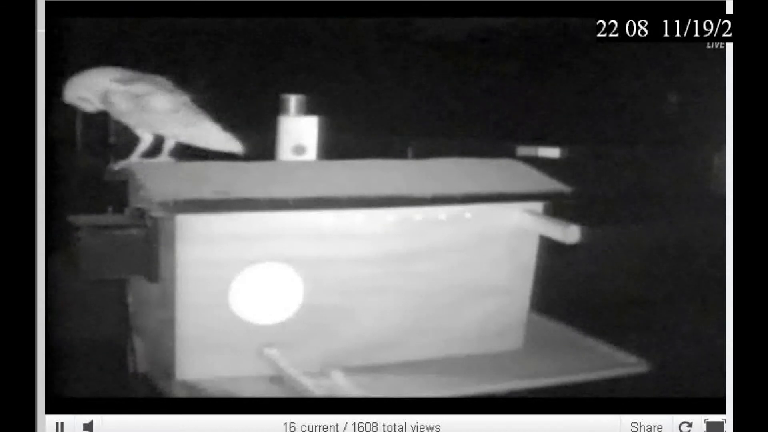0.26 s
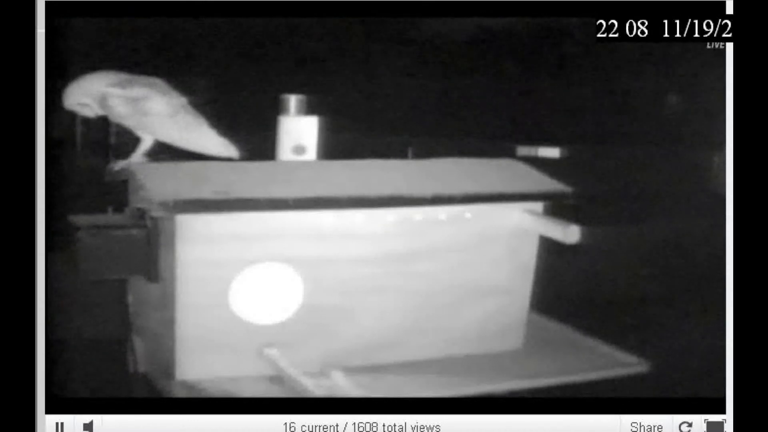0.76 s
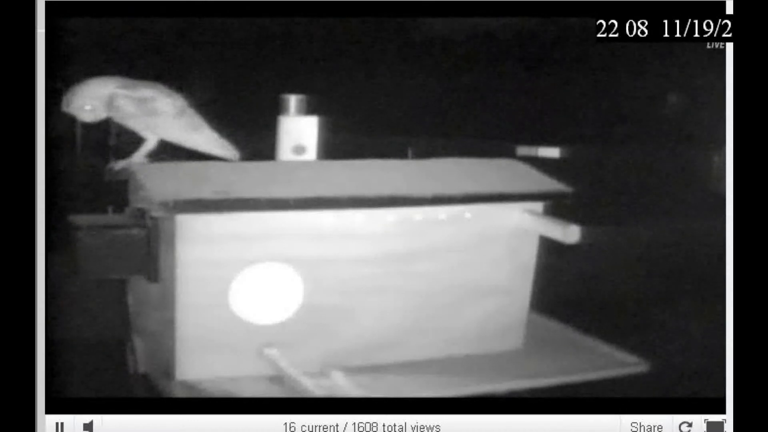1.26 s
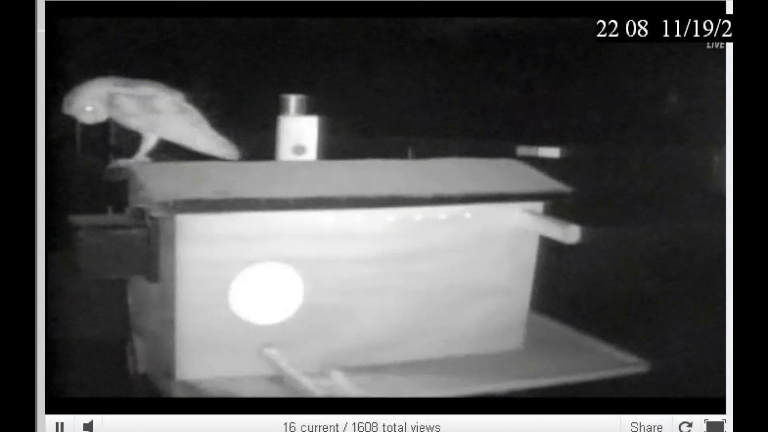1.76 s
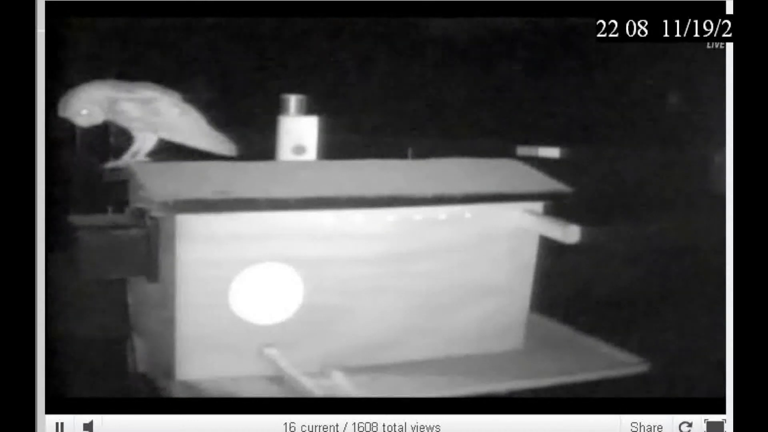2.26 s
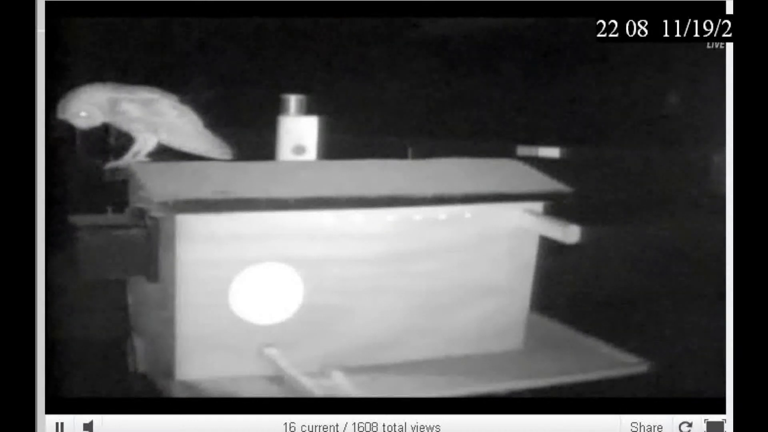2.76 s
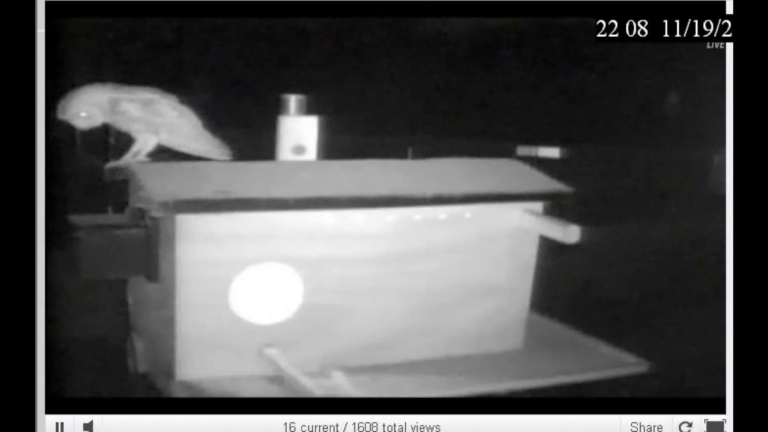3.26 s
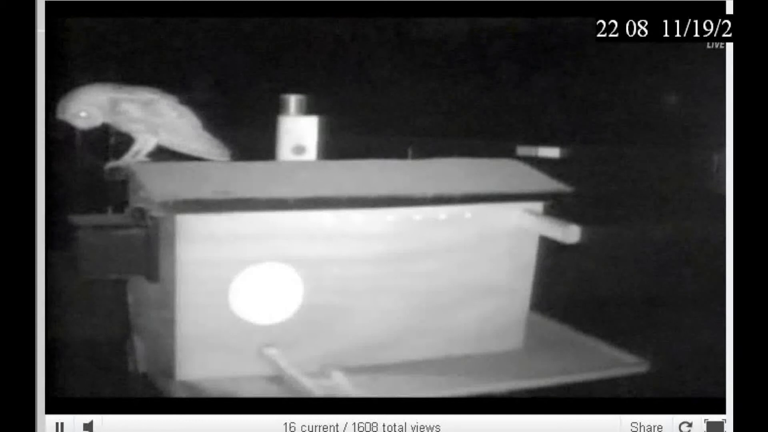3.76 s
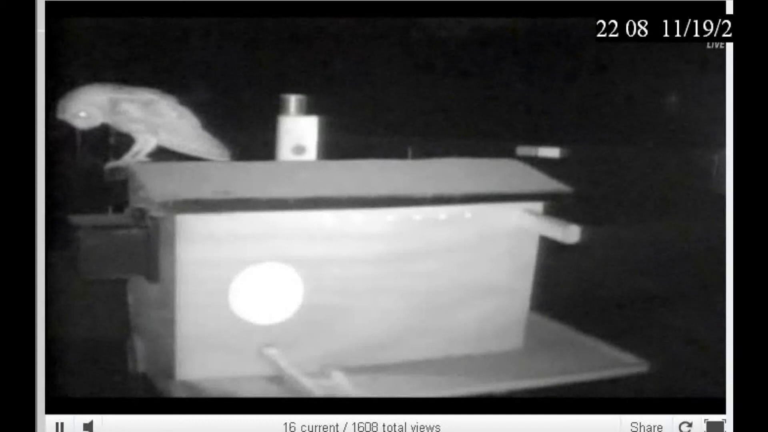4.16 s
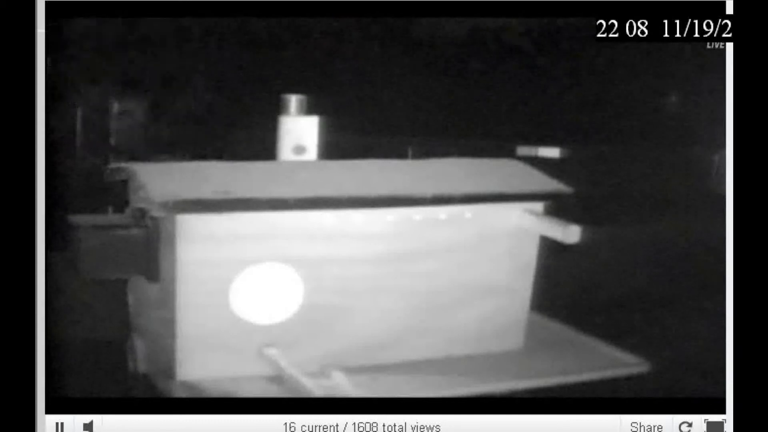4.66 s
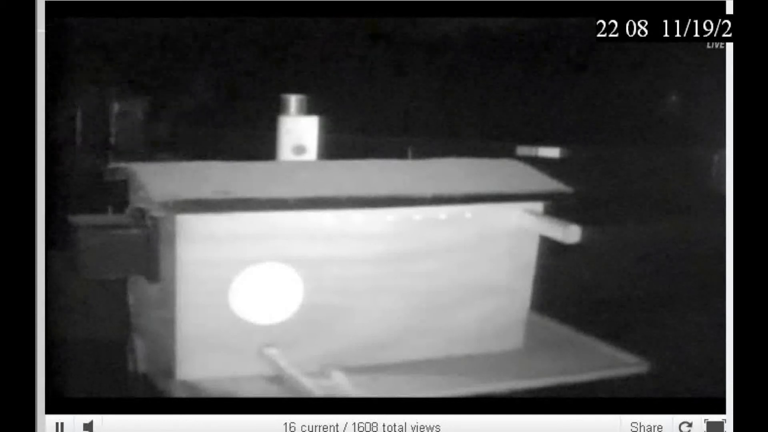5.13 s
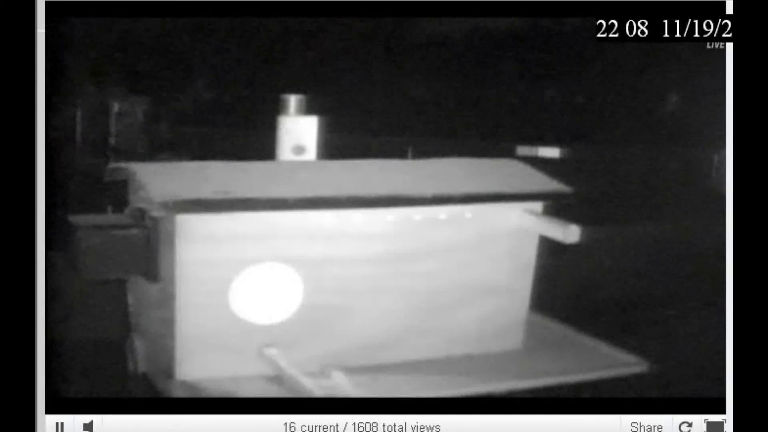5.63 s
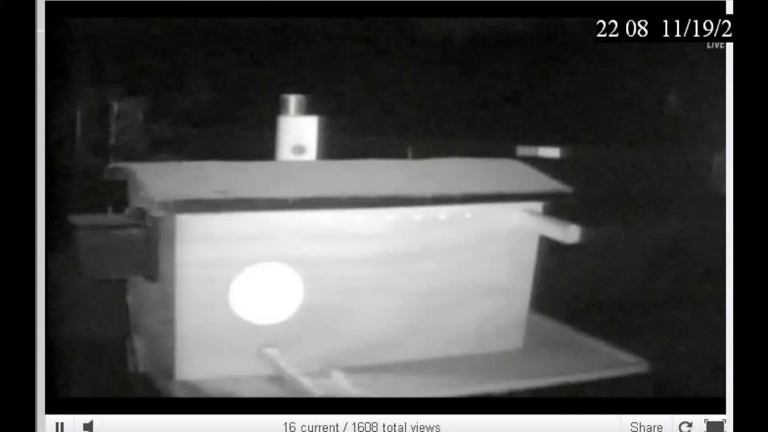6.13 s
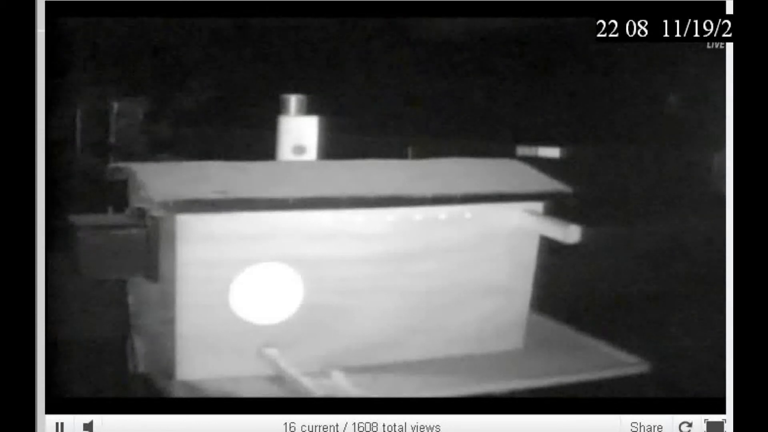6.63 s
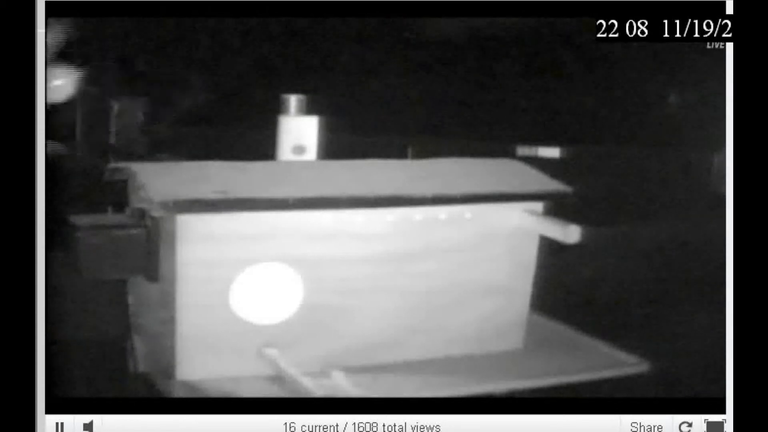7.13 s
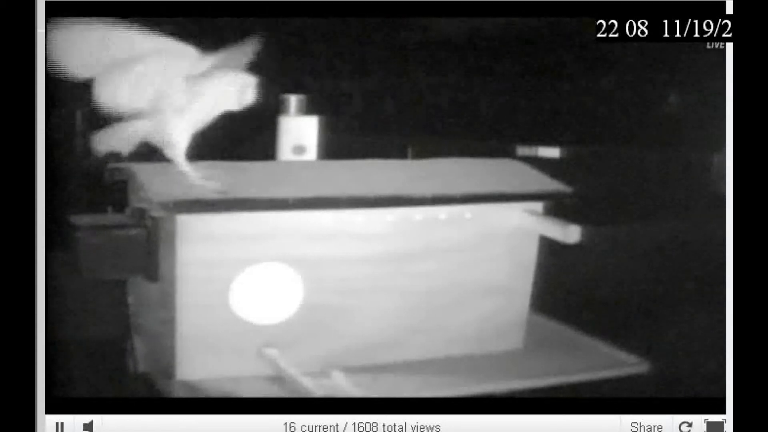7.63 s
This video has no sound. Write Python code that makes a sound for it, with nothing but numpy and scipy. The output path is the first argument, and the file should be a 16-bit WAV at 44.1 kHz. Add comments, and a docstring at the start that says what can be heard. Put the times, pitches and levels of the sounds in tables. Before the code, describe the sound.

A close microphone inside a hollow wooden nest box picks up low, wavering night hum, with light hiss, deep rumble and a faint rough high whine. Around 1 s an owl begins shifting on the roof: dry, gritty talon scratches and soft hollow knocks, densest from 1.2 to 1.9 s, with a strong thump near 1.75 s and a bright scrape just after. Sparser steps and scratches come at 2.3, 2.6 and 3.1 s. At about 3.4 and 3.75 s two massive stamps boom through the box, the loose roof rattling, peaks breaking into harsh crackle. Lesser knocks follow near 4 s, with small scrapes until 4.3 s. The hum thins and it is nearly quiet, save a tiny tick around 5.4 s. From 6.05 to 6.4 s a quick cluster of scrapes and firm woody thumps breaks out, then only quiet hum, hiss and whine to the end, near 7.9 s.

```python
"""Night air hums first, close around a microphone inside a wooden nest box, under hiss, rumble and a faint whine.
Then an owl shifts about on the roof: talons scrape the boards as stick-slip ticks that ring the upper box modes,
and feet knock the hollow box, each push shaking cavity, roof and walls into their low modes.
The hardest blows overflow the converter and wrap; the sound is then passed on over a narrow, noisy stereo line."""
import sys
import numpy as np
from scipy import signal
from scipy.io import wavfile
from scipy.ndimage import uniform_filter1d

SR = 44100
rng = np.random.default_rng(int(sys.argv[2]) if len(sys.argv) > 2 else 0)


def digitize_waveform(pressure):
    """Quantize a signal to 16-bit integers and store it at the path in sys.argv[1].

    Rows of a 2-D input are taken as channels; values are limited to [-1, 1].
    """
    field = np.atleast_2d(pressure).T
    bounded = np.clip(field, -1, 1)
    quanta = np.round(bounded * 32767).astype(np.int16)
    wavfile.write(sys.argv[1], SR, quanta)


N = 347949


def undb(db):
    """dB to amplitude gain."""
    return 10 ** (np.asarray(db) / 20)


def level(x, db):
    """Scale to an rms level in dB."""
    return x * undb(db) / np.sqrt(np.mean(x ** 2))


def curve(rows):
    """Draw straight lines through (seconds, value) rows, read at every sample."""
    seconds, values = np.transpose(rows)
    return np.interp(np.arange(N) / SR, seconds, values)


def band(x, lo_hz, hi_hz, order=2):
    """Butterworth band-pass."""
    return signal.sosfilt(signal.butter(order, [lo_hz, hi_hz], "band", fs=SR, output="sos"), x)


def walk(rate):
    """Random levels held 1 / rate seconds and smoothed twice; spread near 1."""
    hold = int(SR / rate)
    steps = np.repeat(rng.standard_normal(N // hold + 1), hold)
    smooth = uniform_filter1d(uniform_filter1d(steps, hold), hold)
    return 1.3 * smooth[:N]


# Resonances of the wooden box. Each row: frequency in Hz, relative gain in dB, 60 dB decay time in seconds.
BOX_MODES = [(117.3, -2.2, 0.22), (144.1, -3.5, 0.17), (166, -8, 0.15), (189.97, -2.5, 0.18),
             (208.44, -6, .12), (231.6, -5.5, 0.13), (261.4, -13, 0.14), (307.4, -10.5, 0.061),
             (369.4, -6.5, 0.15), (393, -7, 0.086), (521, -12, 0.0086), (783, 4, 0.075), (856, 3, 0.13),
             (1116, -5, 0.059), (1460, -4.5, 0.015), (1614, -7, 0.039), (1958, 0.5, 0.026),
             (2143, -1, 0.042), (2957, 4.5, 0.0065), (3583, 8, 0.012), (4170, 11, 0.0074),
             (5140, 14.5, 0.0088), (5790, 13.5, 0.0048), (6600, -16, 0.011)]


def ring(force, lo_hz, hi_hz):
    """The box modes between two frequencies, each a decaying sine driven by a force."""
    out = 0
    for hz, db, t60 in BOX_MODES:
        if lo_hz <= hz < hi_hz:
            pole = np.exp((2j * np.pi * hz - np.log(1000) / t60) / SR)
            out = out + undb(db) * signal.lfilter([1], [1, -pole], force).imag
    return out


RUMBLE_DB, HUSH_EDGE_S = -51.5, .12  # rumble level outside the hushes, time to slope in or out of one
# Spells in which the line rumble falls quiet. Each row: start in seconds, end in seconds, drop in dB.
HUSHES = [(4.046, 5.663, 19), (7.3, 7.53, 6.1)]
WHINE_HZ, DIP_HZ, CREEP_S = 12000, 1150, .24  # centre pitch, depth of a dip, time constant of its return
# Moments when the whine drops in pitch. Each entry: time in seconds.
WHINE_DIPS = [4.13, 5.41, 7.43]


def line_noise(hiss_db=-71.0, whine_db=-78.0, tone_db=-82.5, flutter_db=-7.0):
    """White hiss on each side, a thin tone, a slow rumble, and a rough whine whose pitch rides on the rumble."""
    t = np.arange(N) / SR
    hush_db = 0
    for start, end, drop_db in HUSHES:
        inside_s = np.minimum(t - start, end - t)
        hush_db = hush_db + drop_db * np.clip(inside_s / HUSH_EDGE_S + .5, 0, 1)
    rumble_gain = undb(RUMBLE_DB - hush_db)
    rumble = level(band(rng.standard_normal(N), 13, 23), 0) * rumble_gain

    swing_hz = 5e5 * rumble
    dip_hz = sum(DIP_HZ * (t >= s) * np.exp(-np.maximum(t - s, 0) / CREEP_S) for s in WHINE_DIPS)
    # fast random walks roughen both pitch and level
    whine_hz = np.clip(WHINE_HZ - dip_hz + swing_hz + 250 * walk(900), 6000, 14800)
    whine = np.sin(2 * np.pi * np.cumsum(whine_hz) / SR) * undb(whine_db + 2.5 * walk(400))

    tone = undb(tone_db) * np.sin(2 * np.pi * 5860 * t)
    hiss = undb(hiss_db) * rng.standard_normal((2, N))
    # the quicker part of the rumble differs left and right and dies away at 2 dB per second
    quick = band(rng.standard_normal((2, N)), 22, 70, order=1)
    flutter = level(quick, flutter_db) * rumble_gain * undb(-2.0 * t)
    return hiss + whine + tone + rumble + flutter


# Colour of the night air. Each row: frequency in Hz, relative noise density in dB.
AIR_COLOUR = [(29, -50), (50, -26), (75, -10), (224, -1.5), (292, -17), (373, -6.5), (449, -48),
              (866, -21.5), (980, -22), (1200, -30), (6740, -49.5), (8760, -75), (14800, -120)]
# Rise and fall of the night air. Each row: time in seconds, level in dB before a 3 dB trim.
AIR_LEVEL = [(0, -48.5), (2, -47.5), (3.3, -46), (4.2, -46.5), (4.5, -51), (6.3, -51.5), (6.7, -54.5),
             (7.89, -54.5)]


def night_air(box_db=-12.5):
    """Narrow noise bands a third of an octave apart that flicker alone, part of them humming in the box modes."""
    hz, db = np.transpose(AIR_COLOUR)
    air = 0
    for mid_hz in 56 * 2 ** np.arange(0, 7, 1 / 3):
        noise = rng.standard_normal(N)
        colour_db = np.interp(np.log(mid_hz), np.log(hz), db)
        gain = undb(colour_db + 0.81 * walk(5.9))
        air = air + gain * band(noise, mid_hz * 0.98, mid_hz * 1.045, order=1)
    hum = ring(air, 60, 1300)
    return (level(air, 0) + level(hum, box_db)) * undb(curve(AIR_LEVEL) - 3.0)


FADE_S, FADE_PER_RISE = .06, 2.5  # 60 dB fade time of a scrape: a base, plus this many rise times


def drag(rise, t):
    """How hard a talon drags: a smooth rise, then a fade, longer for slow drags."""
    t60 = FADE_S + FADE_PER_RISE * rise
    onset = np.sin(np.pi / 2 * np.minimum(t / rise, 1)) ** 2
    return onset * undb(-60 * np.maximum(t - rise, 0) / t60)


# Talon scrapes on the boards. Each row: middle of the rise in seconds, relative level in dB, pitch in Hz,
# fall away from that pitch in dB per octave, rise time in seconds.
SCRAPES = [(.962, -67, 1350, -1.7, 0.013), (.981, -50, 1420, 14, 0.013), (1.022, -57.5, 1380, 9, 0.015),
           (1.08, -49, 680, 25, 0.011), (1.191, -53, 680, 19, .011), (1.252, -52, 1700, 5, 0.025),
           (1.371, -56.5, 1920, 5, 0.012), (1.49, -61, 2130, 9, .015), (1.516, -47, 1960, 16, 0.023),
           (1.534, -49, 2160, 2, 0.026), (1.555, -38, 700, 14, 0.0048), (1.74, -52, 1740, 2.3, 0.033),
           (1.761, -38, 4290, 19, 0.011), (1.837, -30, 2190, 9.5, 0.017), (1.871, -58.5, 5500, 14, .015),
           (1.912, -42.5, 3230, 7, 0.016), (2.249, -50, 1580, 5, 0.039), (2.263, -42.5, 700, 5, 0.011),
           (2.595, -41.5, 2290, 8.5, 0.024), (2.604, -43.5, 5300, 6, 0.012), (2.903, -54, 5310, 7, 0.015),
           (3.076, -53, 5290, 5.5, 0.032), (3.306, -52, 2130, 0.86, 0.022),
           (3.697, -48.5, 750, 14.5, 0.021), (3.811, -52, 1470, 6.5, 0.012), (3.946, -59.5, 1940, 1, 0.024),
           (4.113, -46, 1940, 3.5, 0.012), (4.14, -57, 750, 2, 0.042), (4.16, -57, 3600, 9, .03),
           (4.173, -57, 2800, 12, .025), (4.253, -55, 1750, 18, .025), (5.376, -58, 3720, 3.5, 0.014),
           (6.07, -53, 4760, 5, 0.024), (6.072, -55, 2800, 6, .03), (6.1, -53, 1820, 10.5, .018),
           (6.255, -53.5, 1950, 7, 0.028), (6.29, -39.5, 1390, 4.5, 0.022), (6.31, -32.5, 1430, 11, 0.0083),
           (6.377, -52, 1400, 24, .018)]
# Edges of the scrape bands. Each entry: frequency in Hz.
SCRAPE_EDGES_HZ = [600, 1200, 2500, 4000, 7000]
# How readily the boards speak. Each entry: relative gain in dB of one scrape band, low to high.
BOARD_DB = [4, 0.4, -3.5, 1.5]


def scrapes(spread_db=1.5, bare_db=-2.5, squeak_db=18.0):
    """Talons stick and slip over the grain: dense uneven ticks into the upper modes, partly heard bare."""
    uneven = undb(spread_db * rng.exponential(size=N))
    ticks = level(rng.standard_normal(N) * uneven, 0)
    t = np.arange(SR // 4) / SR
    out = np.zeros(N)
    starts = [int((middle - rise / 2) * SR) for middle, _, _, _, rise in SCRAPES]
    for board_db, lo_hz, hi_hz in zip(BOARD_DB, SCRAPE_EDGES_HZ, SCRAPE_EDGES_HZ[1:]):
        force = np.zeros(N)
        for (_, db, hz, fall_db, rise), at in zip(SCRAPES, starts):
            octaves = abs(np.log2(np.sqrt(lo_hz * hi_hz) / hz))
            gain = undb(db + board_db - fall_db * octaves)
            force[at:at + len(t)] += gain * drag(rise, t) * ticks[at:at + len(t)]
        # both paths are scaled by what steady ticks would give in this band
        rung = ring(force, lo_hz, hi_hz) / ring(ticks, lo_hz, hi_hz).std()
        bare = undb(bare_db) * force / band(ticks, lo_hz, hi_hz).std()
        out += band(rung + bare, 0.86 * lo_hz, 1.175 * hi_hz)
    # each talon tip squeaks in a narrow band at the pitch of its scrape
    for (_, db, hz, _, rise), at in zip(SCRAPES, starts):
        tip = band(drag(rise, t) * ticks[at:at + len(t)], .97 * hz, 1.03 * hz)
        out[at:at + len(t)] += undb(db + squeak_db) * tip
    return out


# Foot-falls on the roof. Each row: time in seconds, relative level in dB,
# place (0 over the air cavity, 1 mid roof, 2 on the wall edge).
FOOT_FALLS = [(1.106, -41, 1.0), (1.239, -22.5, 0.62), (1.272, -26, .2), (1.288, -23, .9),
              (1.418, -35, 0.34), (1.526, -28, 1.74), (1.549, -19.5, 1.74), (1.589, -27.5, 0.64),
              (1.745, -26, 1.7), (1.764, -10.5, 0.5), (1.809, -17, .3), (1.846, -21, 1.06),
              (1.889, -21.5, 0.24), (2.263, -23, 0.27), (2.31, -27.5, 0.19), (2.598, -18, .9),
              (2.618, -21, .8), (2.642, -22, .85), (2.662, -23, .9), (2.827, -25, 0.44), (2.868, -39, 0.27),
              (3.066, -32.5, 0.38), (3.209, -37.5, .3), (3.42, -17, 1.27), (3.698, -24, 0.043),
              (3.9, -22, .8), (3.935, -21, .5), (3.977, -14, .15), (4.158, -39.5, 2.1), (4.377, -38, .02),
              (5.442, -45, 0.98), (6.084, -32.5, 0.64), (6.139, -31.5, 0.73), (6.227, -33.5, .1),
              (6.307, -15.5, 0.6), (6.324, -13, .7), (6.328, -22, 1.9), (6.35, -20, .3), (6.381, -17, .5),
              (6.385, -27, 1.9), (6.42, -27, .7)]
# Two hard stamps. Each row: time in seconds, relative level in dB, place as above.
STAMPS = [(3.428, -1.8, .88), (3.762, -1.8, .7)]
# Each stamp and the loose roof rattling after it. Each row: delay in seconds, level change in dB, shift of place.
RATTLE = [(0, 0.5, 0), (.0065, -2, -.03), (.016, -1, -.2), (0.0234, -2.5, -.03), (.047, -3.5, -.64),
          (.101, -16, .02)]
# Own notes of air cavity, roof and walls. Each entry: frequency in Hz.
PANEL_HZ = [112, 203, 390]
# Edges of the mode bands that the three panels drive. Each entry: frequency in Hz.
KNOCK_EDGES_HZ = [60, 160, 290, 600]
PANEL_FALL_DB = 12.0  # a panel one place away from the foot is shaken this much less
HARD_DB = -9.5  # blows above this push briefly
FOOT_CYCLES, STAMP_CYCLES = 4.2, 2.2  # length of a soft and a hard push, in panel cycles
LEAD_CYCLES = .8  # how early a hard push starts, in roof cycles; a soft one leads in proportion to its length


def knocks(haze_db=-29.0):
    """Each foot-fall shakes every panel for a few of its own cycles, a hard blow more briefly; low modes ring on."""
    rattles = [(s + later, db + change_db, place + shift)
               for s, db, place in STAMPS for later, change_db, shift in RATTLE]
    rows = np.array(FOOT_FALLS + rattles)
    hard = rows[:, 1] > HARD_DB
    out, roof = 0, np.zeros(N)
    for (when, db, place), cycles in ((rows[~hard].T, FOOT_CYCLES), (rows[hard].T, STAMP_CYCLES)):
        lead_s = LEAD_CYCLES * cycles / STAMP_CYCLES / PANEL_HZ[1]
        at = ((when - lead_s) * SR).astype(int)
        for panel, (own_hz, lo_hz, hi_hz) in enumerate(zip(PANEL_HZ, KNOCK_EDGES_HZ, KNOCK_EDGES_HZ[1:])):
            t = np.arange(int(cycles / own_hz * SR)) / SR
            push = np.hanning(len(t)) * np.sin(2 * np.pi * own_hz * t) * 4 / len(t)
            blows = np.zeros(N)
            blows[at] = undb(db - PANEL_FALL_DB * abs(place - panel))
            rung = ring(signal.oaconvolve(blows, push)[:N], lo_hz, hi_hz)
            out = out + band(rung, 0.99 * lo_hz, 1.15 * hi_hz, order=1)
        # for the haze: the cube of each blow's strength at mid roof
        roof[at] = undb(db - PANEL_FALL_DB * abs(place - 1)) ** 3
    # a short swell of grainy mid-band noise around each blow: 36 ms long, started 5 ms early
    swell = signal.oaconvolve(roof, np.hanning(int(0.036 * SR)))[int(.005 * SR):][:N]
    grain = level(band(rng.standard_normal(N), 560, 4000, order=1), 0)
    haze = undb(haze_db) * swell * grain
    # the stiff walls send out little below the cavity note
    return band(out, 90, 900, order=3) + haze


def scene():
    """One microphone in the box, the same on both sides."""
    box = knocks() + scrapes() + night_air()
    return np.array([box, box])


FULL_SCALE = 0.72  # amplitude at which the converter overflows
BAND_HZ, TOP_HZ = 7200, 14900  # where the link is fully shut, and the final top cut


def record(dry):
    """Overflow wraps the loudest peaks to the other sign; a narrow link, an uneven balance, line noise, cut top."""
    wrapped = (dry + FULL_SCALE) % (2 * FULL_SCALE) - FULL_SCALE
    # the jumps take a few samples to slew across
    wrapped = dry + uniform_filter1d(wrapped - dry, size=4)
    narrow = signal.sosfilt(signal.cheby2(10, 30., BAND_HZ, fs=SR, output="sos"), wrapped)
    # the link lets a little of the sharpest edges through again near the top
    edge = undb(-9.5) * band(wrapped, 12000, 22000, order=3)
    balance = undb([[-1.6], [1.4]])  # left, right
    wet = np.clip((narrow + edge) * balance + line_noise(), -1, 1)
    return signal.sosfilt(signal.ellip(8, .2, 40, TOP_HZ, fs=SR, output="sos"), wet)


dry = scene()
out = record(dry)
digitize_waveform(out)
```